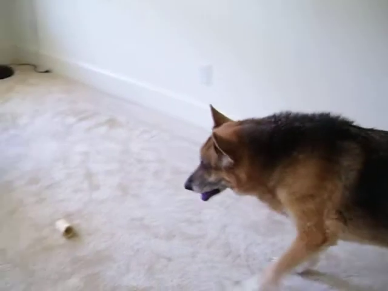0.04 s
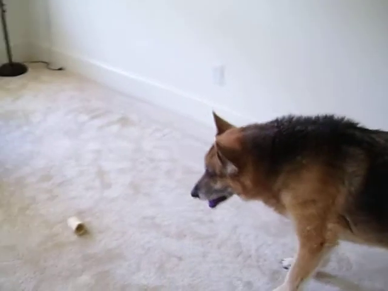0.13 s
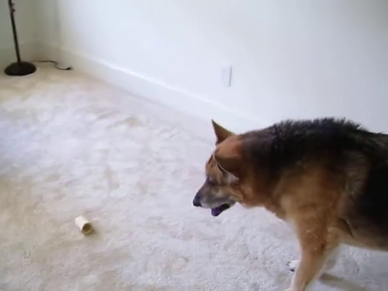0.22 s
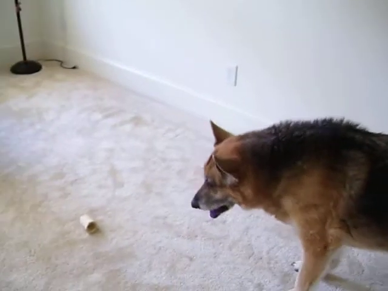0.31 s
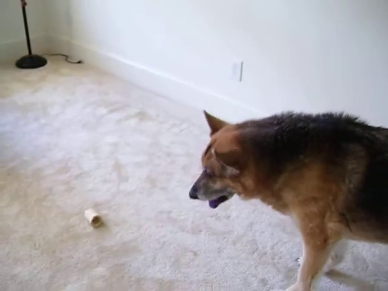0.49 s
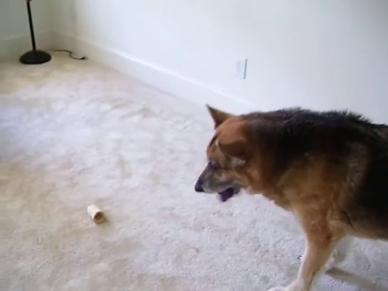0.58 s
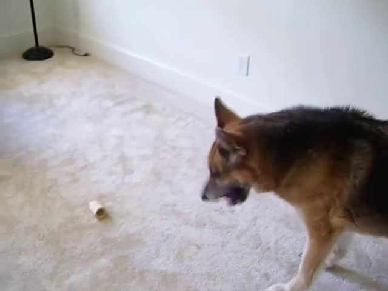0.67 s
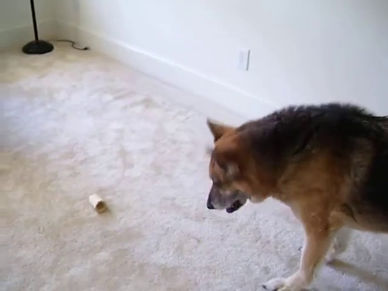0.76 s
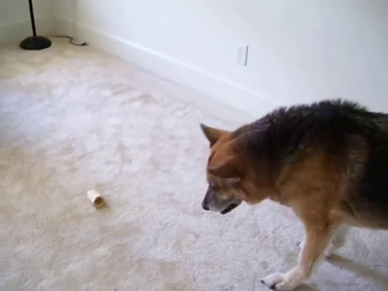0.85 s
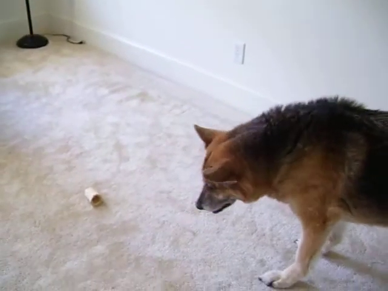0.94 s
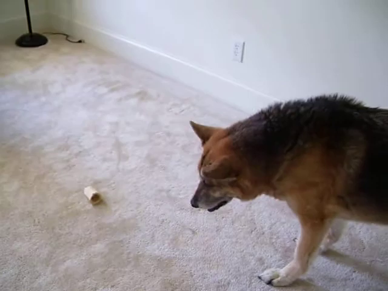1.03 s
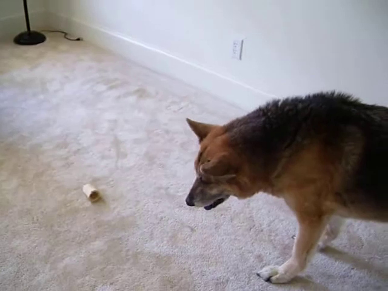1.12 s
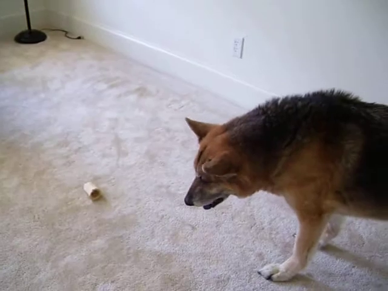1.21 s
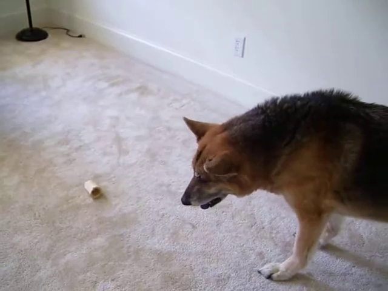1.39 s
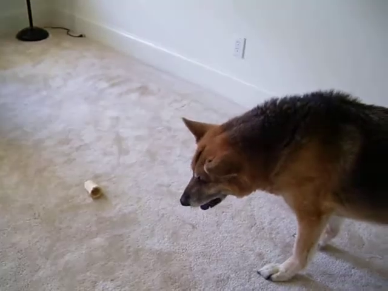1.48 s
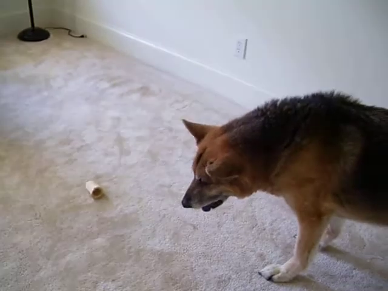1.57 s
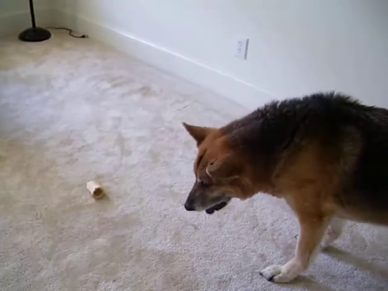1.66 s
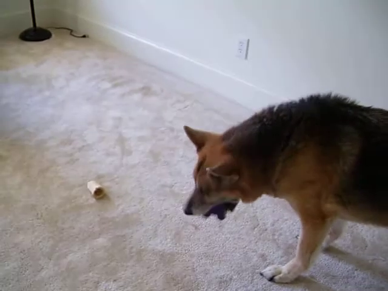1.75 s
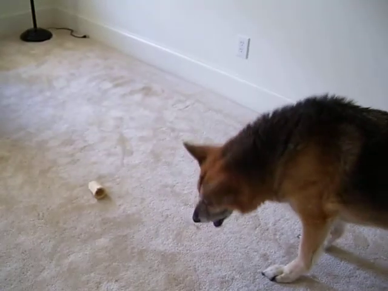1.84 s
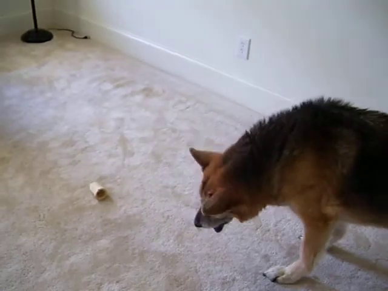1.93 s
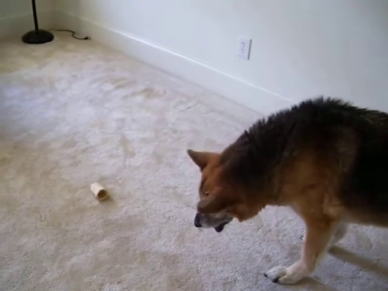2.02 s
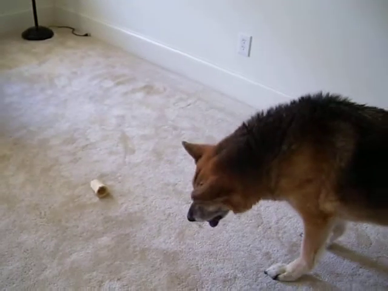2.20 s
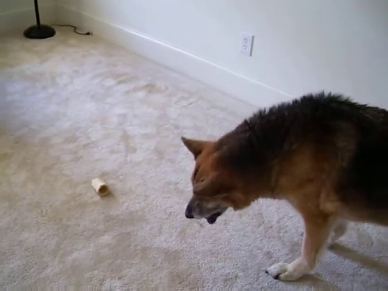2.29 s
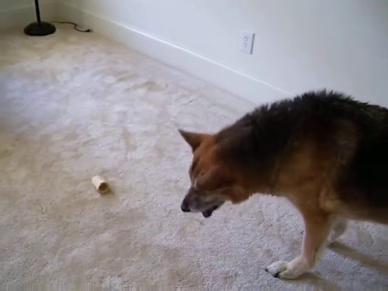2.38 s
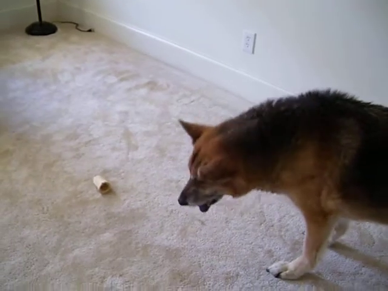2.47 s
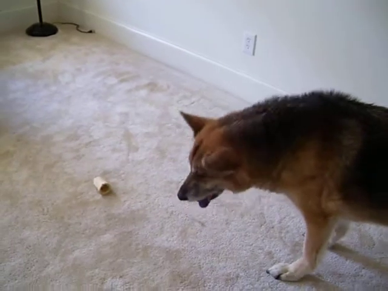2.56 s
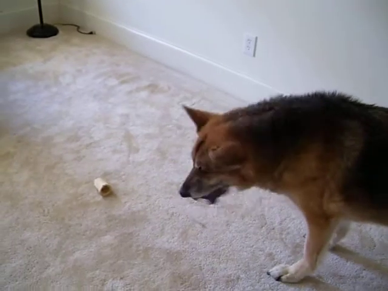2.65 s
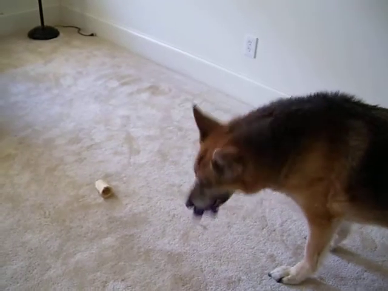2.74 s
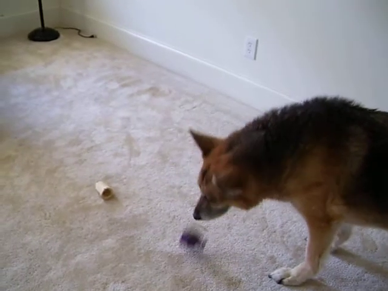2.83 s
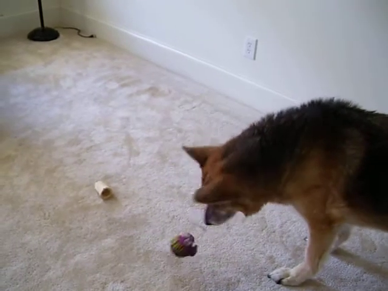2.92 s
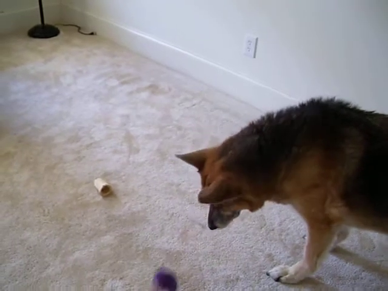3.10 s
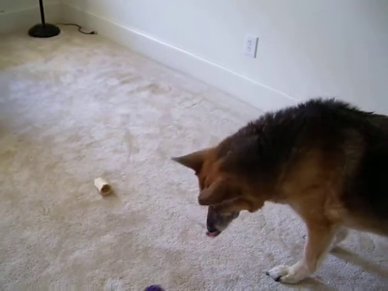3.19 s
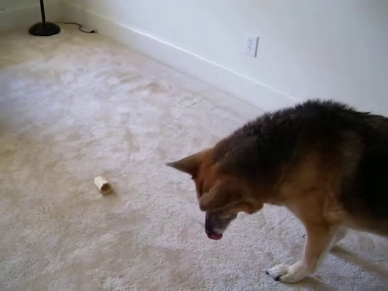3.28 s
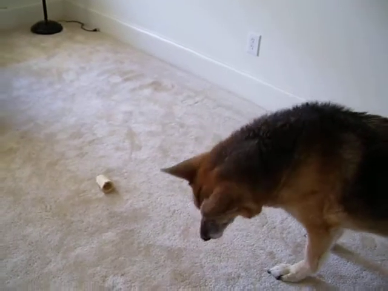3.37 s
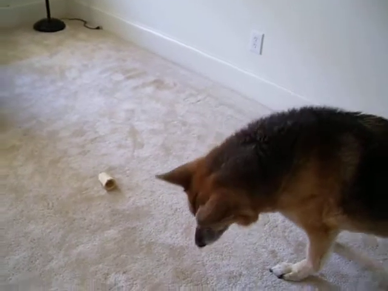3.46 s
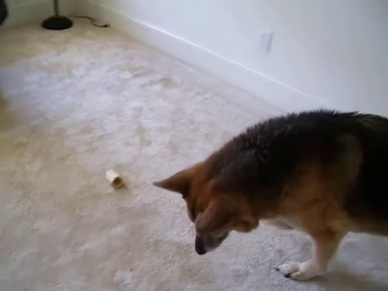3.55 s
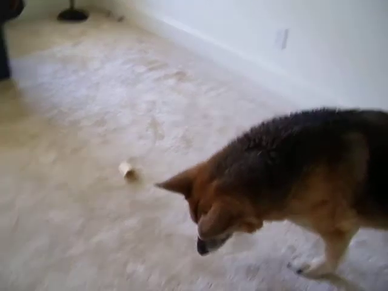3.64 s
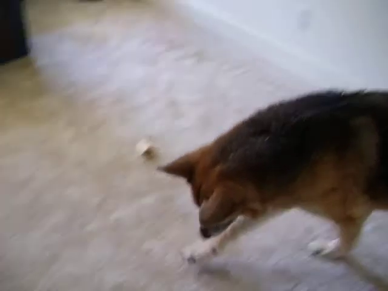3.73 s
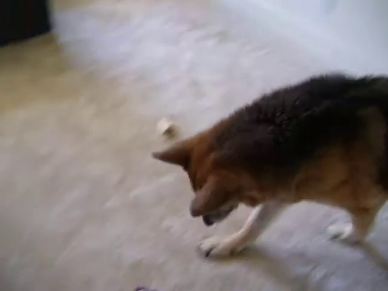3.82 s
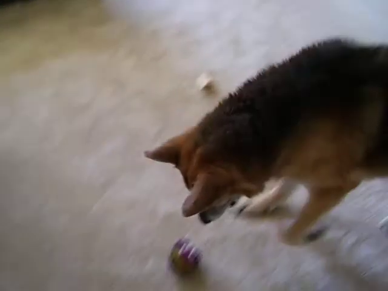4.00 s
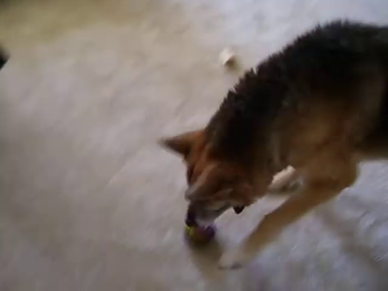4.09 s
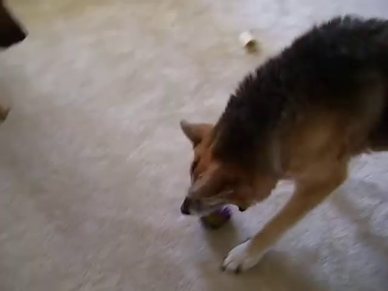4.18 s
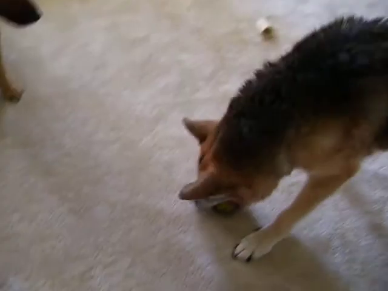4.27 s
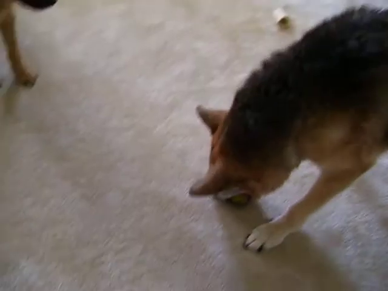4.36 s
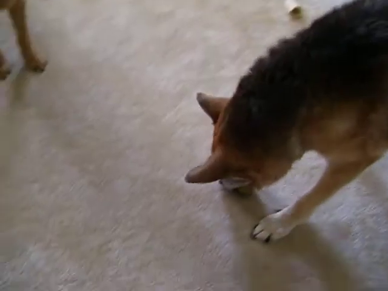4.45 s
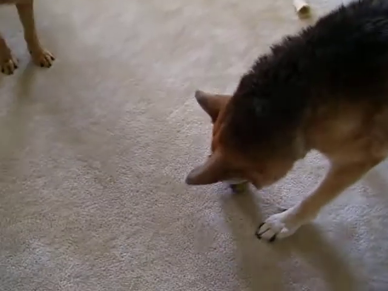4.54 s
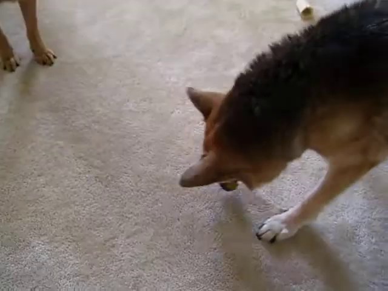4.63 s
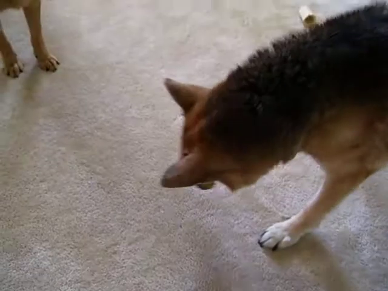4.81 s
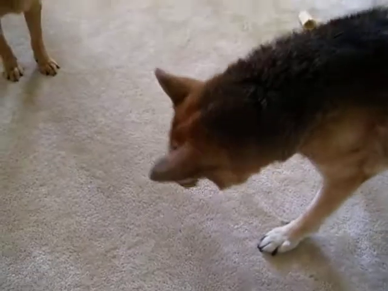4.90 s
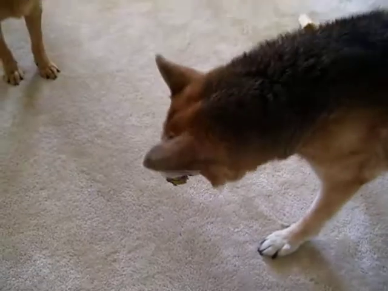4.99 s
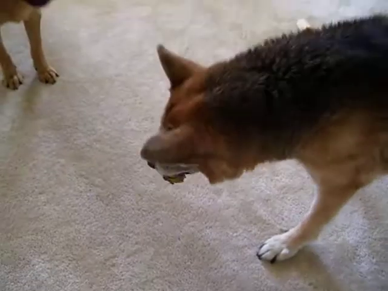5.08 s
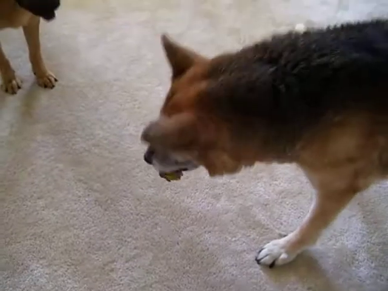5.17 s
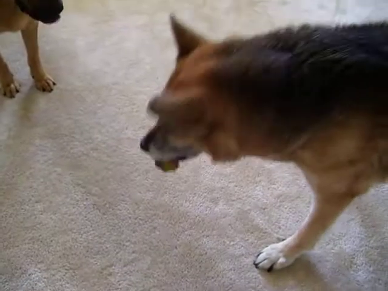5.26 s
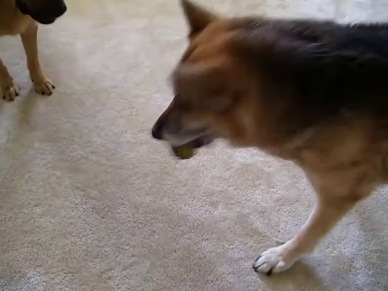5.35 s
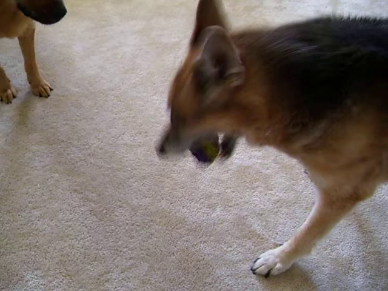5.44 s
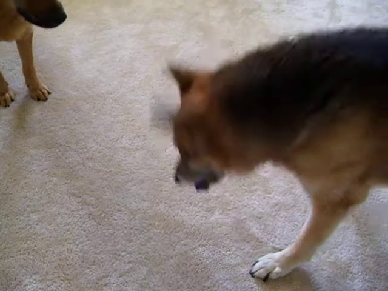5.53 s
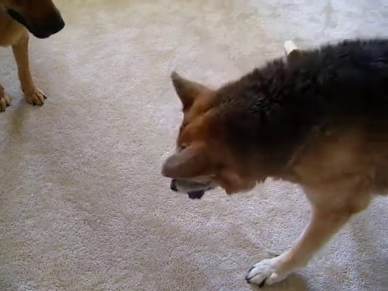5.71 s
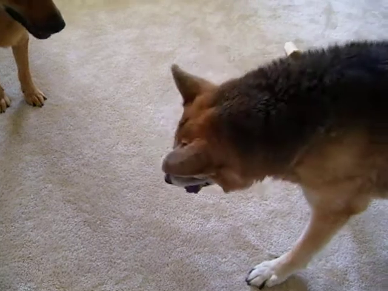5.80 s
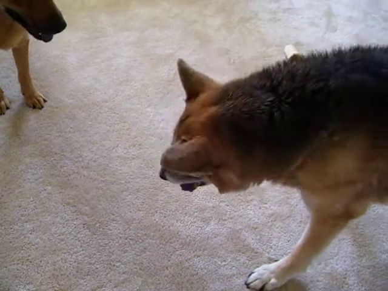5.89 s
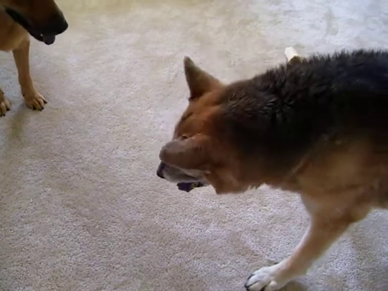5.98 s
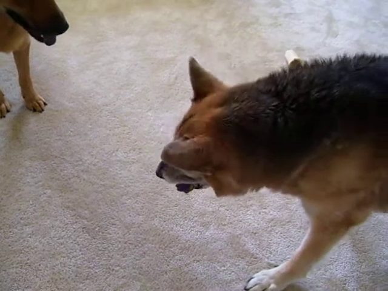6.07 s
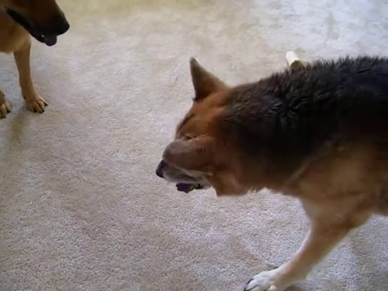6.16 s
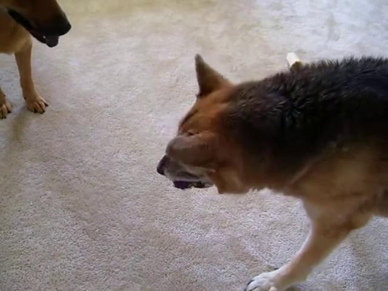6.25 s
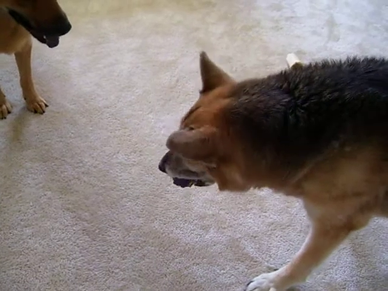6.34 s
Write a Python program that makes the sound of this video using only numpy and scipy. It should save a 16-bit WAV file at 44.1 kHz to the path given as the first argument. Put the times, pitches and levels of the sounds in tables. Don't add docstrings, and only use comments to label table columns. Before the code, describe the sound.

Reedy toy squeaks rise and fall in a dog's jaws, with a dropped toy thumping on carpet, heard through a hissy small camera.

```python
import sys
import numpy as np
from scipy import signal
from scipy.fft import rfft, irfft, next_fast_len
from scipy.io import wavfile
from scipy.ndimage import uniform_filter1d, map_coordinates

SR = 44100
rng = np.random.default_rng(int(sys.argv[2]) if len(sys.argv) > 2 else 0)


def attenuation_scalar(level_db):
    decades = np.asarray(level_db, float) / 20
    return 10 ** decades


def unload_wav(signal):
    wavfile.write(
        sys.argv[1],
        SR,
        np.round(np.clip(np.atleast_2d(signal).T, -1, 1) * 32767).astype(np.int16),
    )


N = 283254

# freq_hz, gain_db
RUSTLE_SPECTRUM = [(500, -21.5), (1400, -5.5), (2500, -5), (3500, -1), (5000, -23)]


def unit(x):
    return x / np.sqrt(np.mean(x ** 2) + 1e-20)


def along(points, hz):
    f, v = np.transpose(points)
    return np.interp(np.log(hz + 1), np.log(f + 1), v)


def wobble(rate_hz):
    knots = rng.standard_normal(int(N * rate_hz / SR) + 4)
    return map_coordinates(knots, [np.arange(N) * rate_hz / SR])


def coloured(x, spectrum):
    m = next_fast_len(N + 8192)
    gain = attenuation_scalar(along(spectrum, np.fft.rfftfreq(m, 1 / SR)))
    return irfft(rfft(x, m) * gain, m)[..., :N]


def noise(spectrum):
    return unit(coloured(rng.standard_normal(N), spectrum))


def knocks(events, width, attack_s, boost_db):
    out = np.zeros(N + SR)
    t = np.arange(SR // 3) / SR
    for start_s, peak_db, hz, t60_s in events:
        b, a = signal.butter(1, [hz / width, hz * width], "bandpass", fs=SR)
        decay = attenuation_scalar(-60 * t / max(t60_s, .005))
        burst = rng.standard_normal(len(t)) * decay * (1 - np.exp(-t / attack_s))
        burst = signal.lfilter(b, a, signal.lfilter(b, a, burst))
        out[round(start_s * SR):][:len(t)] += attenuation_scalar(peak_db + boost_db) * burst / np.abs(burst).max()
    return out[:N]


def camera_hiss():
    # freq_hz, gain_db
    hiss_spectrum = [(12, -50.5), (20, -12.5), (217, -1), (360, 0), (490, -2.5), (729, -4), (1160, -6.5),
                     (1270, -9), (1690, -9.5), (2990, -10.5), (3900, -16), (5070, -59), (8580, -120)]
    return attenuation_scalar(-54.5) * noise(hiss_spectrum)


def carpet():
    # time_s, level_db
    shuffle = [(0.0, -69.5), (0.59, -58), (1.02, -45), (1.18, -57), (1.77, -63), (2.05, -53.5), (2.57, -77),
               (2.84, -63), (3.0, -45), (3.15, -57.5), (3.36, -75.5), (3.74, -61), (4.27, -60),
               (4.579, -52), (5.301, -57), (5.521, -66.5), (5.97, -58), (6.42, -59.5)]
    # freq_hz, gain_db
    brush_spectrum = [(90, -21), (200, -7.5), (400, -2), (680, -0.5), (830, 2), (960, -14.5), (1300, -18),
                      (2500, -30)]
    rustle_db, rustle_follows = -64.5, 0.088
    time_s, level_db = np.transpose(shuffle)
    activity_db = np.interp(np.arange(N) / SR, time_s, level_db)
    brush = unit(attenuation_scalar(2.4 * wobble(15)) * noise(brush_spectrum))
    rustle = unit(attenuation_scalar(1.7 * wobble(42)) * noise(RUSTLE_SPECTRUM))
    rustle_level = attenuation_scalar(rustle_db + rustle_follows * (activity_db - level_db.mean()))
    return attenuation_scalar(activity_db + 2.0) * brush + rustle_level * rustle


def thumps():
    # start_s, peak_db, centre_hz, t60_s
    thump_events = [(0.103, -49, 374, 0.13), (0.299, -44, 754, 0.56), (0.614, -42.5, 331, 0.081),
                    (0.67, -46, 345, 0.081), (0.719, -45, 860, 0.21), (1.384, -27.5, 635, 0.19),
                    (1.577, -45.5, 842, 0.11), (1.669, -44.5, 842, 0.14), (2.498, -49, 813, 0.16),
                    (3.007, -27, 617, 0.27), (3.297, -44.5, 510, 0.11), (3.451, -47, 428, 0.067),
                    (4.037, -43, 794, 0.61), (4.089, -39, 626, 0.038), (4.427, -37, 517, 0.079),
                    (5.349, -69, 845, 0.077)]
    return knocks(thump_events, 1.306, 0.0015, 0.5)


def squeaker():
    # time_s, pitch_hz, level_db, tilt_db_per_octave
    sucks = [
        [(.755, 640.5, -27, -4), (.784, 629.6, -25, 3), (.8, 639, -27.5, -0.5), (.81, 591.6, -27.5, 2),
         (.822, 607, -41.5, -5.5), (.835, 572, -31, -3), (.85, 530, -47.5, 8)],
        [(1.858, 643.6, -31, -10.5), (1.888, 636, -26, 2), (1.905, 595, -38.5, 8), (1.915, 562, -31, 2),
         (1.928, 610.6, -33.5, -4), (1.946, 588, -34, 2.5), (1.958, 524, -26, 5)],
        [(2.815, 676, -27, -1), (2.844, 634.5, -25, -1), (2.862, 590, -35.5, -3.5), (2.876, 647, -37, -8),
         (2.892, 614.4, -28.5, 12.5), (2.914, 574.6, -32, 4), (2.93, 614.4, -27, 4.5),
         (2.965, 601.4, -31.5, 3.5), (3.012, 577.5, -31.5, -11.5)],
    ]
    late_sucks = [
        [(5.511, 777, -31, 4.5), (5.528, 802.6, -22, -6), (5.55, 777, -23.5, -1.5), (5.574, 743, -26.5, 4.5),
         (5.59, 721, -34.5, 16.5), (5.6, 640.5, -24, -1.5), (5.614, 699, -26.5, -2.5), (5.624, 639, -29.5, 1),
         (5.64, 572, -28.5, -17.5)],
        [(6.042, 624.7, -32, -3), (6.104, 622, -29.5, -2.5), (6.114, 595.5, -31, 0), (6.165, 569.3, -35, -4),
         (6.2, 568.5, -40.5, -5.5), (6.25, 584.5, -40, -6), (6.3, 580.2, -37, -3), (6.355, 575, -34, -5),
         (6.395, 556, -57, 3.5)],
    ]
    bites = [
        [(.898, 955, -23.5, 0), (.95, 953.6, -23.5, -1.5), (.975, 1006, -18.5, 7), (1.002, 1053, -15.5, 7),
         (1.02, 1149, -21, 2), (1.032, 1293, -15.5, 2.5), (1.055, 1406, -18, 1.5), (1.068, 1560, -19.5, 4),
         (1.091, 1594, -13.5, -4.5)],
        [(1.092, 2163, -8.5, -6.5), (1.12, 2118, -9.5, -4), (1.138, 2111, -12, -8), (1.158, 2122, -7, -1)],
        [(4.488, 993.4, -29.5, -4), (4.521, 1004, -26.5, -0.5), (4.54, 1086, -28, -5.5),
         (4.553, 1161, -26.5, -4), (4.567, 1477, -23.5, -5), (4.581, 1923, -28.5, -6), (4.6, 2790, -18.5, 5.5),
         (4.612, 3326, -31, 2.5), (4.628, 4140, -29.5, 3.5)],
    ]
    snap = [
        [(5.674, 938, -29, 0.5), (5.685, 995, -17.5, 5.5), (5.698, 1070, -27, -1), (5.716, 1484, -20, -1),
         (5.727, 2011, -17, -5.5), (5.745, 2796, -23.5, 6), (5.755, 3407, -23, .5), (5.768, 3430, -16.5, 3),
         (5.778, 4010, -34.5, 4)],
    ]
    eases = [
        [(1.152, 1571, -16, -1.5), (1.17, 1369, -15.5, 5), (1.184, 1032, -18.5, 4), (1.205, 930, -26, 1),
         (1.225, 900, -24.5, -2.5)],
        [(2.002, 959, -21.5, 3), (2.048, 1000, -26, 10), (2.063, 1038, -18.5, 6), (2.098, 1061, -22, .5),
         (2.115, 1038, -19.5, 3.5), (2.132, 996, -28, 1.5), (2.155, 969.4, -26, 7), (2.197, 880, -33.5, -5)],
        [(4.802, 4200, -46, 4), (4.817, 3016, -19.5, -0.5), (4.832, 2800, -24, 24), (4.878, 1487, -26.5, -3),
         (4.91, 1131, -26, 3.5), (4.98, 964, -27, 1.5), (5.04, 905, -30.5, 0.5), (5.11, 967.5, -26, -3.5),
         (5.19, 879.3, -30.5, 0)],
        [(5.889, 4197, -33.5, 3), (5.901, 2941, -16.5, -6), (5.907, 2108, -24.5, -7.5), (5.915, 1440, -16.5, 2),
         (5.924, 1251, -21.5, 1), (5.93, 1123, -22.5, 0), (5.94, 964, -25.5, 4.5), (5.965, 818, -26.5, -2)],
    ]
    # freq_hz, gain_db
    suck_colour = [(600, 0.35), (1200, -1.5), (1800, -3), (2400, 0.5), (3000, -0.5), (3500, -0.5),
                   (4100, -12)]
    blow_colour = [(950, -1.5), (1500, -6.5), (2100, -1.5), (2900, 3.5), (3400, -1.5), (3900, -7),
                   (4500, -15.5)]
    order_db = [-0.06, -1.8, -1.9, .1, 0.55, -0.28, .1, .1]
    rough, flutter_db, air_db = 0.0015, 2.5, -28
    settle_s, pivot_hz = .003, 1500
    thin_db, pure_hz = 1, 1100
    stutter_db, fast_glide = 4.5, 47

    out = np.zeros(N)
    drift, leak, catch = wobble(150), noise(RUSTLE_SPECTRUM), wobble(180)
    flutter = [wobble(45) for _ in range(8)]
    # squeaks, colour, attack_s, pitch bend at onset (slack reed sharp, pressed reed flat), fade_s, final sag
    kinds = [(sucks + late_sucks, suck_colour, 0.0059, 0.41, .014, 0),
             (bites + snap, blow_colour, .002, -.15, 0.0045, 0),
             (eases, blow_colour, .002, 0, .014, .18)]
    for squeaks, colour, attack_s, onset_bend, fade_s, droop in kinds:
        for rows in squeaks:
            s, hz, level_db, bright_db = np.transpose(rows)
            a, b = round(s[0] * SR), round(s[-1] * SR)
            t = np.arange(a, b) / SR
            start = np.clip((t - s[0]) / attack_s, 0, 1)
            end = np.clip((s[-1] - t) / fade_s, 0, 1)

            bend = 1 + onset_bend * np.exp((s[0] - t) / settle_s) - droop * (1 - end) + rough * drift[a:b]
            pitch = np.exp(np.interp(t, s, np.log(hz))) * bend
            phase = 2 * np.pi * np.cumsum(pitch) / SR

            glide = np.abs(np.gradient(np.interp(t, s, np.log2(hz)))) * SR
            haste = np.clip(uniform_filter1d(glide, size=441) / fast_glide, 0, 1)
            db = np.interp(t, s, level_db) + stutter_db * haste * np.minimum(catch[a:b], 1)

            tilt = np.interp(t, s, bright_db)
            thin = thin_db * np.log2(np.maximum(pitch / pure_hz, 1))
            stack, power = 0, 0
            for k in range(1, 9):
                partial_hz = k * pitch
                partial_db = order_db[k - 1] + along(colour, partial_hz) + tilt * np.log2(partial_hz / pivot_hz)
                partial_db = partial_db - thin * np.log2(k) + flutter_db * flutter[k - 1][a:b]
                gain = attenuation_scalar(partial_db) * start ** np.sqrt(k) * (partial_hz < 4700)
                stack = stack - gain * np.cos(k * phase - 0.69 * (k - 1))
                power = power + gain ** 2 / 2
            reed = stack * start / np.sqrt(power + 1e-12)
            out[a:b] += end * attenuation_scalar(db) * (reed + start * attenuation_scalar(air_db) * leak[a:b])
    return attenuation_scalar(2.5) * out


def jaws():
    # start_s, peak_db, centre_hz, t60_s
    jaw_events = [(0.804, -35.5, 204, 0.079), (0.834, -25, 466, 0.068), (0.859, -42, 439, 0.1),
                  (1.904, -33.5, 458, 0.12), (1.923, -34.5, 250, 0.15), (1.947, -35, 283, 0.17),
                  (2.847, -37.5, 462, 0.19), (2.893, -20, 449, 0.1), (2.914, -37, 183, 0.14),
                  (2.938, -33, 277, 0.1), (2.959, -41, 339, 0.1), (3.006, -22.5, 322, 0.15),
                  (3.029, -59, 458, 0.12), (3.046, -30, 272, 0.27), (3.077, -35, 420, 0.058),
                  (5.52, -21.5, 412, 0.15), (5.557, -42, 226, 0.12), (5.599, -24.5, 424, 0.13),
                  (5.629, -25.5, 458, 0.086), (5.65, -31.5, 295, 0.3)]
    return knocks(jaw_events, 1.9, 0.0037, -2.2)


def ticks():
    # start_s, peak_db, centre_hz, t60_s
    tick_events = [(1.385, -25.5, 709, 0.025), (1.793, -36.5, 2350, 0.025), (1.829, -63, 852, 0.027),
                   (2.5, -39.5, 793, 0.025), (3.516, -50, 805, 0.025), (3.839, -24.5, 1227, 0.025),
                   (3.879, -34.5, 970, 0.036), (4.078, -43.5, 1410, 0.025), (4.092, -36.5, 1390, 0.023),
                   (4.182, -27, 1660, 0.065), (4.185, -35, 1550, 0.037), (4.199, -43, 1510, 0.02),
                   (4.43, -27.5, 1120, 0.036), (5.403, -38, 653, 0.042), (5.428, -39.5, 759, 0.017)]
    return knocks(tick_events, 1.21, 0.00035, 0.054)


def rubs():
    # start_s, peak_db, centre_hz, t60_s
    rub_events = [
        (4.03, -42.5, 1880, 0.19),
        (4.21, -42, 2800, 0.063),
        (5.4, -52, 1500, 0.074),
    ]
    return knocks(rub_events, 1.7, 0.02, 0)


def walls(x):
    # delay_s, gain_db
    early_copies = [(.0021, -10), (.0062, -7), (.0097, -12.5), (.0134, -8), (.0178, -11), (.0231, -14),
                    (.0294, -9.5), (.037, -16)]
    out = np.zeros(N)
    for k, (delay_s, gain_db) in enumerate(early_copies):
        out += (-1) ** k * attenuation_scalar(gain_db) * np.pad(x, (round(delay_s * SR), 0))[:N]
    return out


def room(x):
    # freq_hz, t60_s
    room_decay = [(200, 0.95), (700, 0.35), (2000, 0.36), (4000, 0.31)]
    gap_s, part_s = 0.0037, .35
    size = round(part_s * SR)
    fade = np.hanning(2 * size)
    out = np.zeros(N + 2 * SR)
    x = np.pad(x, (size, 2 * size))
    for a in range(0, N + size, size):
        hz, t, z = signal.stft(rng.standard_normal(SR // 2), SR, nperseg=256)
        decay = attenuation_scalar(-60 * t / along(room_decay, hz)[:, None])
        tail = signal.istft(z * decay, SR, nperseg=256)[1]
        wet = signal.fftconvolve(fade * x[a:a + 2 * size], tail / np.linalg.norm(tail))
        out[a:a + len(wet)] += wet
    return np.pad(out, (round(gap_s * SR), 0))[size:size + N]


def scene():
    toy = squeaker()
    dog = ticks() + thumps() + jaws() + rubs()
    sent = toy + 0.092 * dog
    echoes = attenuation_scalar(-4) * walls(sent) + attenuation_scalar(-4.0) * room(sent)
    return (toy + dog + echoes + carpet() + camera_hiss())[None]


def top_cut(x):
    return signal.sosfilt(signal.butter(12, 15760, fs=SR, output="sos"), x)


def record(dry):
    # freq_hz, gain_db
    before_sampling = [(3300, 2), (3700, 1), (4000, -9), (4300, -15.5), (4600, -83)]
    after_sampling = [(3500, 1), (4000, 1.5), (4300, -16.5), (4550, -37.5), (4700, -97.5)]
    camera_rate_hz = 8000
    band = np.clip(coloured(dry, before_sampling), -.7, .65)
    tick = 2 * np.pi * camera_rate_hz * np.arange(N) / SR
    sampled = band * (1 + 2 * np.cos(tick) + 2 * np.cos(2 * tick))
    mix = np.clip(coloured(sampled, after_sampling), -.734, .734)
    return top_cut(mix)


dry = scene()
out = record(dry)
unload_wav(out)
```